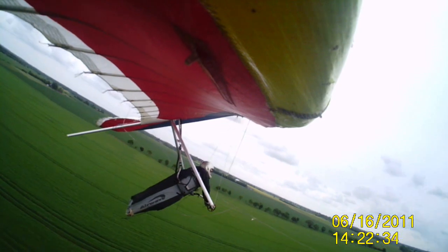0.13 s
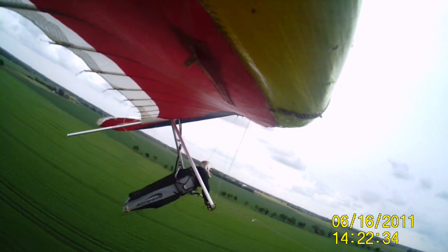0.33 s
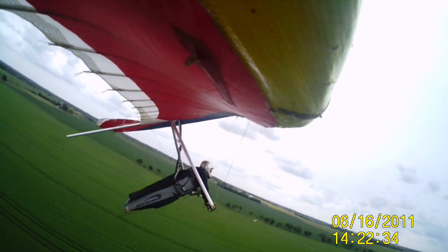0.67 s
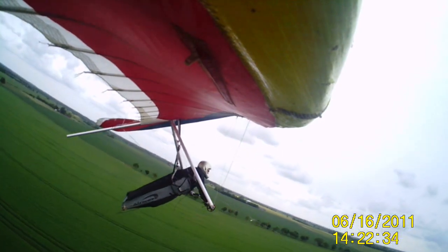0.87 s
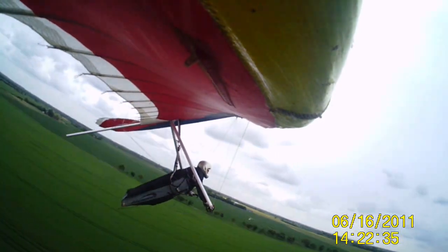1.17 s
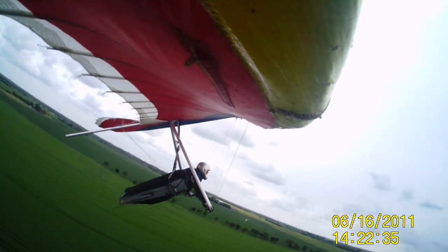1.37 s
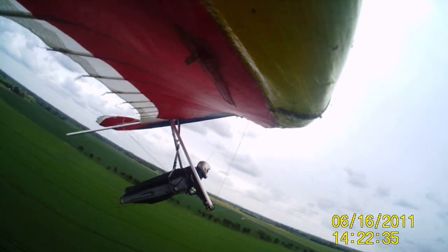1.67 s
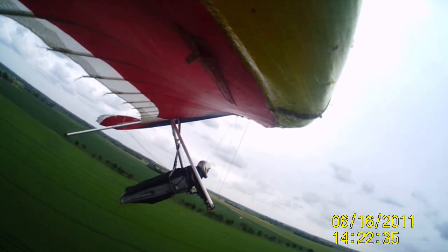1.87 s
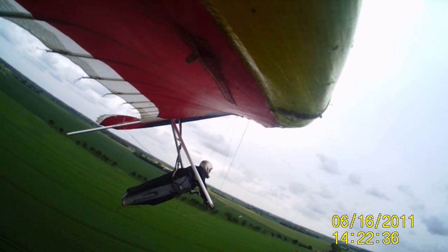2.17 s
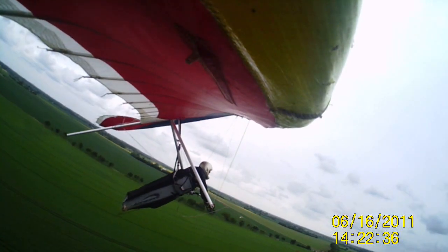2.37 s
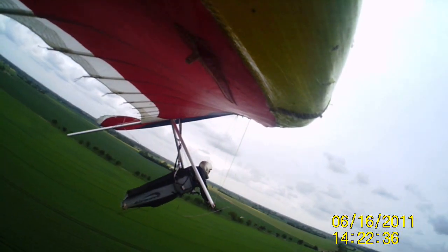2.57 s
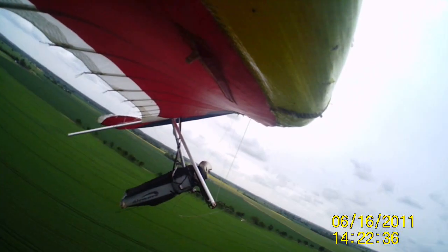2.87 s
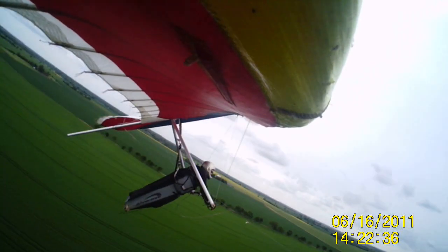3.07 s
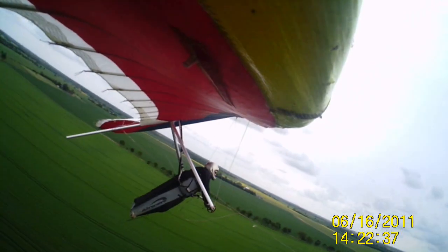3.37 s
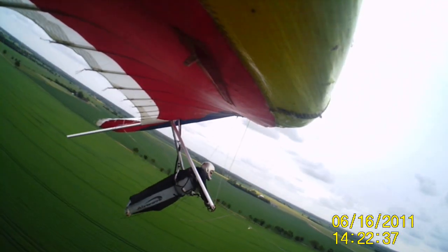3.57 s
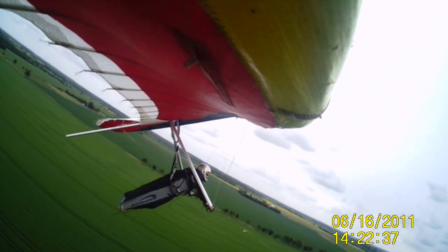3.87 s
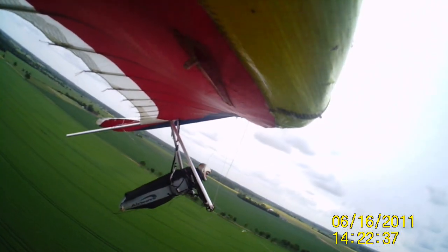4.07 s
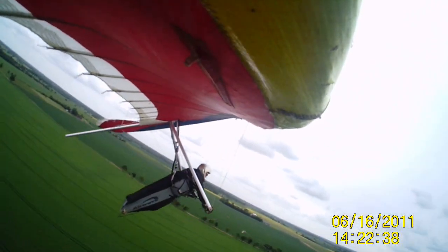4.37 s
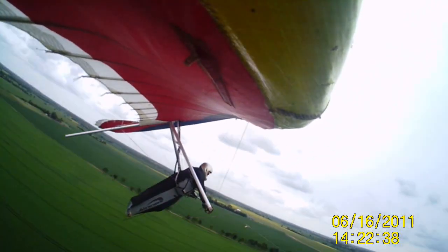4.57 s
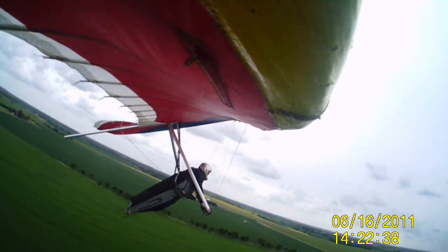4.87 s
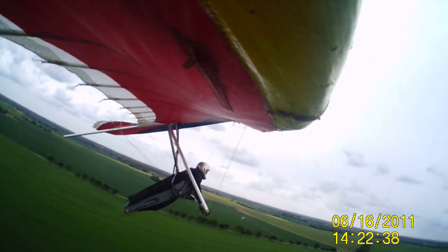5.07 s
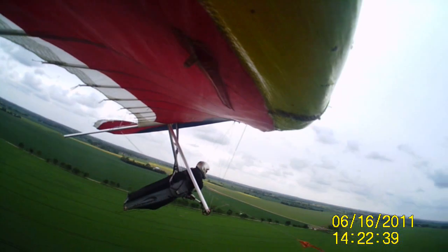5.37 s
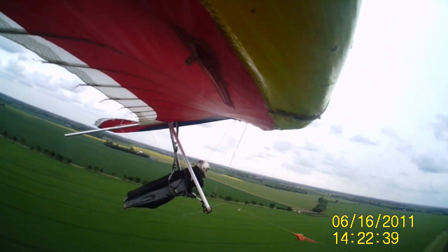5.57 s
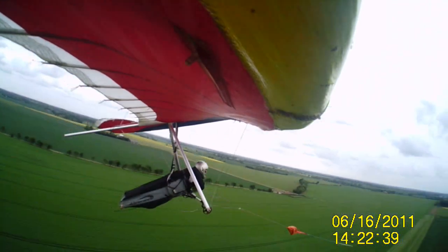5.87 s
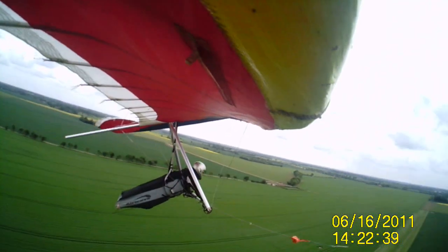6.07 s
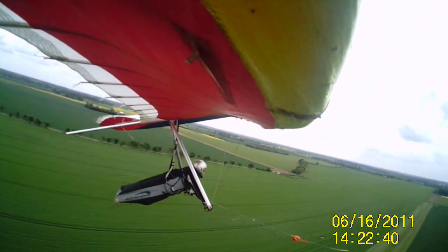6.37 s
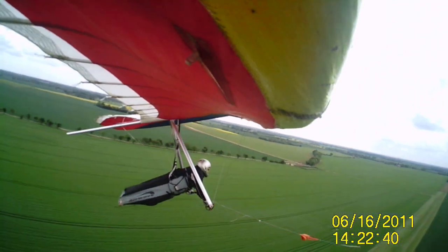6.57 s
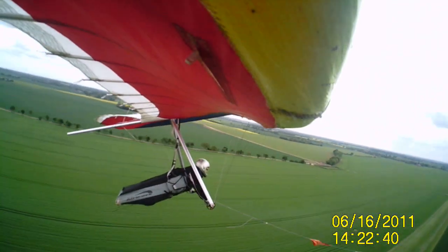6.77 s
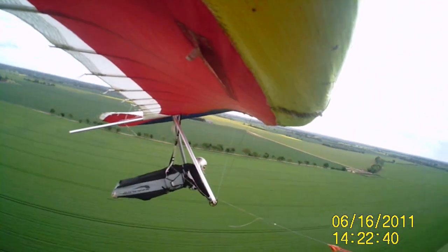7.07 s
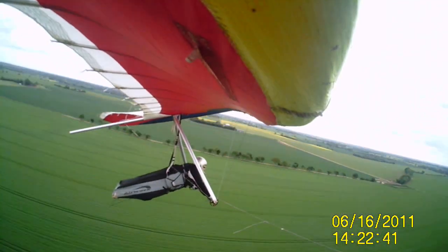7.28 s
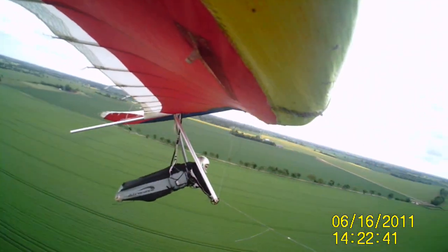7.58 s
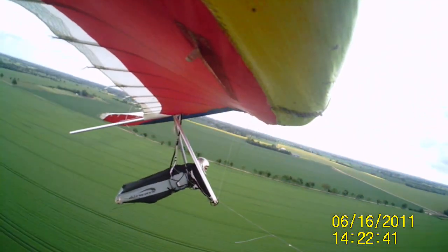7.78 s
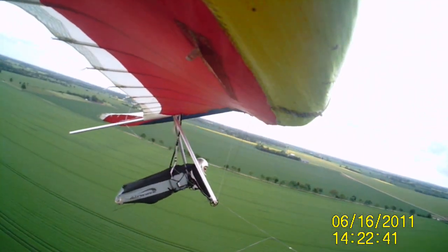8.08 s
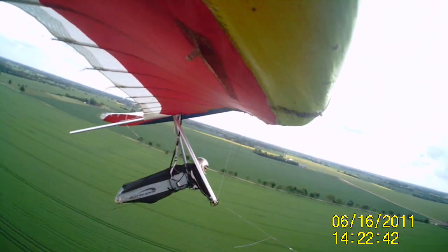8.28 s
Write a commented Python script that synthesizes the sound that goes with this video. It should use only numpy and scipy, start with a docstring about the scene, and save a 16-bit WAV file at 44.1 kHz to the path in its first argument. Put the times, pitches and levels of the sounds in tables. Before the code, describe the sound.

Low, throbbing wind rumble buffets a glider wing in flight, with small knocks, rattling, then one violent overloaded metallic burst before the wind continues.

```python
"""Wind over a small camera clamped to a hang glider's wing tube, in flight.
Strong buffeting swings the frame in three low modes while air hisses and blows the tube's resonances;
a cluster of knocks from slack fittings follows near 1.3 s, and the rush of air peaks near 3 s.
Rattling knocks fill 4.4 to 5.5 s, then the hardest burst, just after 6 s, overloads the input stage.
Looser knocks thin out until 7.3 s and leave the wind and the swinging frame."""
import sys
import numpy as np
from scipy import signal
from scipy.io import wavfile

SR = 44100
rng = np.random.default_rng(int(sys.argv[2]) if len(sys.argv) > 2 else 0)


def undo_db(level):
    """Turn decibels back into plain size, where 20 dB means ten times bigger."""
    steps = np.asarray(level, float) / 20
    return 10 ** steps


def put_to_file(sound):
    """Save the sound as 16-bit audio at rate SR, in the file named by the first command-line argument."""
    columns = np.atleast_2d(sound).T  # one column per channel
    safe = np.clip(columns, -1, 1)
    whole_steps = np.round(safe * 32767)
    wavfile.write(sys.argv[1], SR, whole_steps.astype(np.int16))


N = 371763


def in_time(rows):
    """Each column of a table as a curve, one value a sample."""
    s, *columns = np.transpose(rows)
    return [np.interp(np.arange(N) / SR, s, c) for c in columns]


def rms_one(x):
    """Scaled to unit power."""
    return x / np.sqrt(np.mean(x ** 2) + 1e-20)


def drift(corner_hz):
    """Slow chance of spread 1: noise twice through a one-pole low-pass, made at SR / 40."""
    pole = np.exp(-2 * np.pi * corner_hz * 40 / SR)
    noise = rng.standard_normal(N // 40 + 2002)
    slow = signal.lfilter([1], [1, -2 * pole, pole * pole], noise)[2000:]  # skip the run-in
    return np.interp(np.arange(N) / 40, np.arange(len(slow)), rms_one(slow))


def ring(x, hz, t60):
    """Two-pole resonator: a unit click sets a sine of about height 1 ringing, down 60 dB after t60 seconds."""
    r, w = undo_db(-60 / (t60 * SR)), 2 * np.pi * hz / SR
    return signal.lfilter([0, np.sin(w)], [1, -2 * r * np.cos(w), r * r], x + 1e-18)


# bending modes of the frame: rest pitch f/Hz, width/Hz, pitch wander/Hz, steady share of the power (0-1)
BENDING_MODES = [(41, 50, 1.26, 0.4), (72.7, 16, 2.5, 0.64), (136.9, 27.8, 7.94, 0.22)]
# buffeting of the frame: t/s, level/dB, lean of the load toward slow bending/dB
BUFFETING = [(0.0, -23, 0.5), (0.5, -24.5, 0), (0.8, -20.5, -8), (1.0, -19.5, -8.5), (1.45, -24, -7.5),
             (1.7, -26.5, -2.5), (2.0, -26.5, -17), (2.4, -24.5, -20), (2.7, -23, -14), (2.87, -26, 4),
             (3.3, -22, 5.5), (3.66, -19, 2), (3.9, -23, 6), (4.3, -21, -13), (4.55, -27, 0.5),
             (5.0, -28, -6), (5.3, -32, 0.5), (5.75, -37.5, 1.5), (6.2, -31.5, 7.5), (6.7, -31, -7),
             (7.1, -27, -17.5), (7.7, -28, 1.5), (8.43, -32.5, -3)]
# answer of each bending mode: level over the buffeting/dB, share of the lean, share of the air's rush
MODE_ANSWERS = [(0.0, 0.75, 0.01), (0.0, 0.01, 0.01), (-4, 0.25, 0.3)]
# lurches that throw the nearest bending mode into a short swell: t/s at the top, f/Hz, level/dB
FRAME_LURCHES = [(0.0, 41, -16), (0.14, 72, -36), (0.4, 41, -19), (0.45, 72, -22.5), (0.652, 41, -22.5),
                 (2.539, 72, -16), (4.46, 136, -28.5), (4.79, 136, -29), (4.86, 72, -18), (5.4, 72, -23.5),
                 (5.52, 72, -23), (6.02, 136, -25), (6.078, 41, -9), (6.079, 72, -15.5), (6.079, 136, -24),
                 (6.15, 136, -28), (6.22, 72, -21.5), (6.27, 41, -23), (6.48, 41, -13), (6.76, 72, -29),
                 (6.81, 41, -24), (7.11, 136, -27.5), (7.11, 72, -28.5), (7.391, 72, -34),
                 (7.51, 41, -22.5), (7.96, 72, -23.5), (8.31, 72, -34)]


def frame():
    """Each bending mode swings at a wandering pitch and is shaken at random; the first sags when it swings hard."""
    flutter_db, flutter_hz = 1.5, 5.5
    rise_db_per_s, fall_db_per_s = 169.5, 174.5
    sag_hz_per_db, rest_db = 0.2, -18  # at rest_db the first mode sits on its rest pitch
    buffet_db, lean_db = in_time(BUFFETING)
    rush_db = in_time(AIR_RUSH)[0]
    rush_change_db = rush_db - rush_db.mean()
    t, out = np.arange(N) / SR, 0
    for k, (hz, width_hz, wander_hz, steady) in enumerate(BENDING_MODES):
        over_db, lean_share, rush_share = MODE_ANSWERS[k]
        level_db = buffet_db + over_db + lean_share * lean_db + rush_share * rush_change_db
        level = undo_db(level_db + flutter_db * drift(flutter_hz))
        for s, lurch_hz, db in FRAME_LURCHES:
            if abs(np.log(lurch_hz / hz)) < 0.25:
                near = slice(max(int((s - 0.3) * SR), 0), int((s + 0.3) * SR))
                fade_db = np.maximum(rise_db_per_s * (s - t[near]), fall_db_per_s * (t[near] - s))
                level[near] = np.hypot(level[near], undo_db(db - fade_db))
        sag_hz = 0 if k else sag_hz_per_db * (20 * np.log10(level) - rest_db)
        pitch = hz - sag_hz + wander_hz * drift(3.83)
        swing = np.sin(2 * np.pi * np.cumsum(pitch) / SR)
        shaken = rms_one(ring(rng.standard_normal(N), hz, 2.2 / width_hz))  # t60 from the width
        steady = np.clip(steady, 0, 1)
        out = out + level * (np.sqrt(2 * steady) * swing + np.sqrt(1 - steady) * shaken)
    return out


# modes of the tube: f/Hz, t60/s when blown, relative level/dB when knocked, relative level/dB when blown
TUBE_MODES = [(170, 0.056, -22, -26), (370, 0.02, -15.5, -16.5), (392, 0.016, -10.5, -9.5),
              (552.3, 0.048, -6, -7), (745, 0.053, -3, -2.5), (881.5, 0.023, -0.5, 0),
              (1079.4, 0.029, 2.5, -2), (1214, 0.026, -18.5, -3), (1650, 0.019, -15.5, -27),
              (2219, 0.027, -10.5, -11), (2524, 0.018, -14, -7.5), (2682, 0.028, -4.5, -9.5),
              (3012, 0.021, -16, -14), (3840, 0.013, -8.5, -14.5), (4400, 0.021, -12.5, -17.5),
              (4810, 0.02, -13.5, -24), (5200, 0.0027, -29, -66)]


def knocks():
    """Short contacts drive the tube: low modes swell, high ones bite at once; grit and a crack ride along."""
    contact_scale_s = 0.00178
    ring_share = 0.77  # a fitting resting on the tube shortens its ring
    rows = contacts()
    after = np.arange(round(0.025 * SR))
    at = np.round(rows[:, :1] * SR).astype(int) + after
    age = np.tile(after / SR / contact_scale_s, (len(rows), 1))
    loose = rattle()
    grit = rng.standard_normal(age.shape)
    out = 0
    for k, (hz, t60, knocked_db, _) in enumerate(TUBE_MODES):
        group = np.searchsorted([1900, 3400], hz)  # low, middle or high modes
        rise = (age + [0.05, 0.08, 2.0][group]) ** [1.8, 1.3, 1.01][group]
        contact = rise * np.exp(-age * [1.2, 1.8, 3.0][group])
        contact = contact / contact.sum(axis=1, keepdims=True)
        phase = 2 * np.pi * rng.random((len(rows), 1))
        chance_db = 1.4 * rng.standard_normal((len(rows), 1))
        # each contact loads the tube differently and pushes a little off the mode's pitch
        push_hz = hz * (1 + 0.05 * rng.standard_normal((len(rows), 1)))
        push = 2 * np.cos(2 * np.pi * push_hz * after / SR + phase)
        drive = push + [2.2, 2.5, 3.0][group] * grit
        drive_db = rows[:, 1 + group:2 + group] + [-3.0, 8.0, 6.0][group] + chance_db
        force = loose * undo_db([0.0, -12.0, -20.0][group])
        np.add.at(force, at, contact * drive * undo_db(drive_db))
        out = out + ring(force, hz, ring_share * t60) * undo_db(knocked_db) * (-1) ** k
    # the broad crack of metal on metal, too short to ring
    crack = loose * undo_db(-17.5)
    np.add.at(crack, at, grit * (age + 0.12) * np.exp(-age * 0.81) * undo_db(rows[:, 3:4] - 3.0))
    crack_band = signal.butter(2, [1200, 5600], "band", fs=SR, output="sos")
    return out + signal.sosfilt(crack_band, crack)


# knocks of the fittings: t/s, relative level/dB, hardness/dB (middle modes' drive against that level)
FITTING_KNOCKS = [(0.175, -17.5, -24), (0.771, -20, -23), (1.265, -21, -13.5), (1.339, -16.5, -17),
                  (1.347, -14.5, -15), (1.365, -16, -12), (1.416, -18.5, -25), (1.435, -13.5, -11.5),
                  (1.5, -21, -14), (1.516, -20.5, -11), (3.341, -14, -27), (3.459, -21.5, -37),
                  (3.495, -16.5, -22), (4.372, -26, -20), (4.396, -20.5, -4), (4.425, -15, -16),
                  (4.508, -22.5, -15), (4.516, -16, -23), (4.574, -19, -17), (4.587, -15, -17.5),
                  (4.637, -22, -20.5), (4.664, -21, -18), (4.704, -26, -18), (4.75, -21.5, -21),
                  (5.007, -24.5, -17), (5.092, -24.5, -27), (5.118, -28, -22), (5.22, -24, -2),
                  (5.234, -14, -4.5), (5.261, -25, -30), (5.32, -26, -11), (5.343, -21.5, -9),
                  (5.416, -15.5, -17.5), (5.438, -16.5, -20), (5.495, -27, -11), (5.518, -26.5, -6),
                  (5.997, -8.5, -23), (6.026, -15, -3), (6.039, -10, -3), (6.056, -4.5, -16),
                  (6.062, -7, -2.5), (6.07, 4, -8.5), (6.081, -9.5, -5), (6.099, 1, -6), (6.117, -1, -6.5),
                  (6.127, -16.5, -15), (6.132, -21, 0), (6.147, -3, -17), (6.163, -5.5, -10),
                  (6.176, -28, 15), (6.181, -4, -10.5), (6.188, 7, -14.5), (6.271, -15.5, -3),
                  (6.301, -15.5, -14), (6.324, -13, -13), (6.332, -5.5, -16), (6.374, -27, 3),
                  (6.385, -11, -7), (6.414, -21, -10), (6.43, -9, -17), (6.487, -21.5, -4),
                  (6.491, -10, -25), (6.613, -16.5, -30), (6.855, -19.5, -10), (6.896, -20, -7),
                  (6.916, -12.5, -16.5), (7.075, -20, -19), (7.189, -22.5, -16), (7.297, -17, -13)]
# bare metal clinks on the highest modes, with their crack: t/s, relative level/dB
METAL_CLINKS = [(3.34, -31), (3.457, -37.5), (5.234, -33), (6.014, -38), (6.025, -12), (6.054, -15),
                (6.068, -14.5), (6.08, -18), (6.085, -12.5), (6.094, -17), (6.098, -14), (6.117, -22),
                (6.125, -31), (6.134, -31), (6.164, -23), (6.181, -24), (6.188, -15.5), (6.385, -35),
                (6.492, -28)]


def contacts():
    """Hits on the tube as rows of time and relative drive in dB of the low, middle and high modes."""
    dull = [(s, db, db + hard_db, db - 35) for s, db, hard_db in FITTING_KNOCKS]
    clinks = [(s, -99, -99, db) for s, db in METAL_CLINKS]
    return np.array(dull + clinks)


# spells in which slack fittings rattle between the knocks: start t/s, end t/s, relative level/dB
RATTLE_SPELLS = [(1.257, 1.517, -53), (4.383, 4.76, -48), (4.973, 5.54, -50), (6.007, 6.206, -25),
                 (6.268, 6.51, -38.5), (6.594, 7.323, -48)]


def rattle():
    """Loose contact as random ticks, in clumps while a spell lasts and dying away quickly after it."""
    ticks_per_s, settle_s = 700, 0.0052  # settle_s: time constant of the decay
    t = np.arange(N) / SR
    level = 0
    for start, end, db in RATTLE_SPELLS:
        level = level + undo_db(db) * (t >= start) * np.exp(-np.maximum(t - end, 0) / settle_s)
    clumps = undo_db(4 * drift(21))
    ticks = (rng.random(N) < ticks_per_s / SR) * rng.standard_normal(N)
    return level * clumps * ticks


# rush of the air: t/s, relative level/dB, brightness/dB per octave
AIR_RUSH = [(0.0, -30, -0.5), (0.68, -31, -0.5), (1.03, -34, -0.16), (1.95, -31.5, -2.06),
            (2.37, -31.5, -0.8), (2.6, -27.5, -1.4), (2.91, -26.5, -1.54), (3.54, -28, 0.06),
            (4.3, -35, -0.9), (4.72, -39, -1), (5.82, -39.5, -1.25), (6.15, -33, -3), (6.26, -40.5, -0.5),
            (6.41, -36.5, -1.1), (6.69, -36, -1.4), (7.09, -32, -1), (8.43, -35.5, -0.4)]
# broad noise of the flow over the microphone port: f/Hz, relative density/dB per Hz
PORT_NOISE = [(15, 33), (25, 11), (100, 13), (190, 10.5), (280, 0), (450, 0.5), (1250, -6.5), (1500, -35.5),
              (2000, -12), (3000, -22.5), (3300, -16), (4000, -9), (5000, -51), (6300, -14)]


def airflow():
    """Turbulence hisses at the port and blows the tube's modes; level and brightness follow the rush."""
    rush_db, tilt_db = in_time(AIR_RUSH)
    gusts = undo_db(0.5 * drift(2.9) + 0.53 * drift(45.0))
    port_hz, port_db = np.transpose(PORT_NOISE)
    edges, out = 18 * 2 ** np.arange(0, 8.6, 1 / 3), 0  # third-octave bands
    white = rng.standard_normal((2, N))  # neighbouring bands take different noise
    for k, (low, high) in enumerate(zip(edges, edges[1:])):
        centre = np.sqrt(low * high)
        band_pass = signal.butter(2, [low, high], "band", fs=SR, output="sos")
        band = signal.sosfilt(band_pass, white[k % 2])
        band_db = np.interp(np.log(centre), np.log(port_hz), port_db)
        out = out + band * undo_db(band_db + tilt_db * np.log2(centre / 900))
    out = out * undo_db(5.5)
    for hz, t60, _, blown_db in TUBE_MODES:
        blown = rms_one(ring(rng.standard_normal(N), hz, t60))
        out = out + blown * undo_db(blown_db - 8.5 + tilt_db * np.log2(hz / 900))
    return out * undo_db(rush_db) * gusts


def scene():
    """Frame, knocks and airflow add up at the one microphone, through the clamp and the port."""
    return (frame() + knocks() + airflow())[None]


def low_pass(x):
    """Removes everything above the highest recorded frequency."""
    return signal.sosfilt(signal.butter(12, 15750, fs=SR, output="sos"), x)


def record(dry):
    """The microphone cuts steeply toward 7 kHz and rolls off below 18 Hz; the next stage clips with a tight knee."""
    mic_top_hz, overload, knee = 7000, 0.98, 11  # overload in full scale
    dull = signal.sosfilt(signal.cheby2(18, 60, mic_top_hz, fs=SR, output="sos"), dry)
    dull = signal.sosfilt(signal.butter(2, 18, "high", fs=SR, output="sos"), dull)
    clipped = dull / (1 + np.abs(dull / overload) ** knee) ** (1 / knee)
    return low_pass(clipped)


dry = scene()
out = record(dry)
put_to_file(out)
```